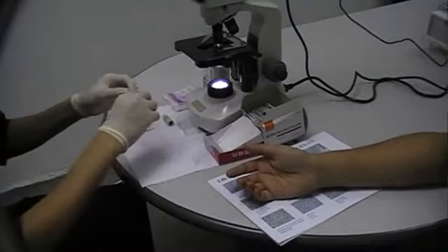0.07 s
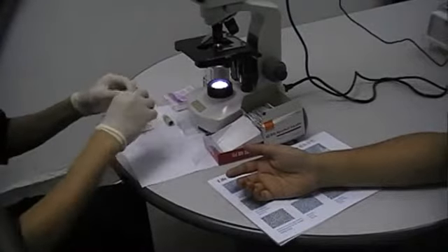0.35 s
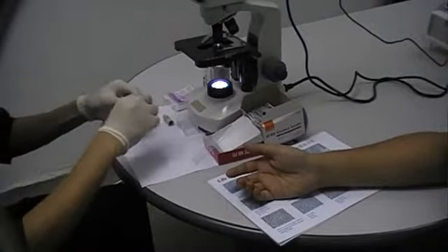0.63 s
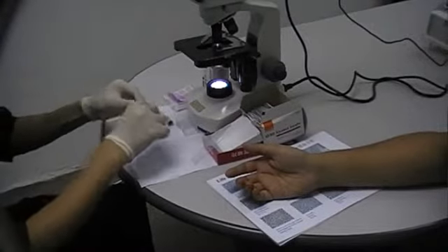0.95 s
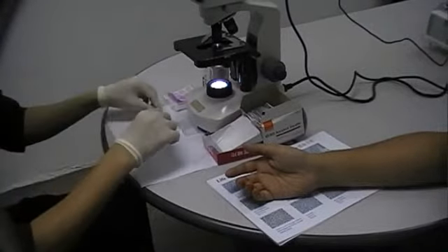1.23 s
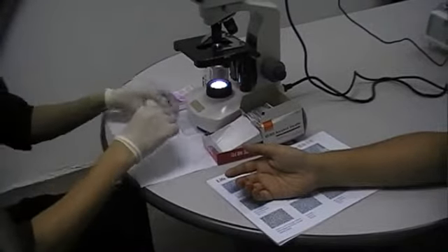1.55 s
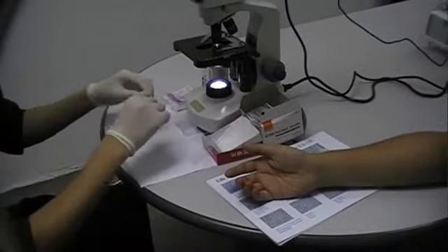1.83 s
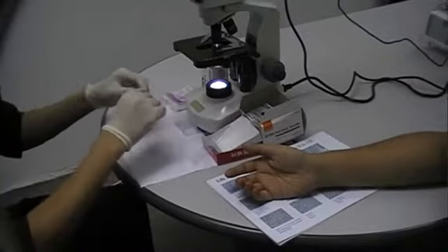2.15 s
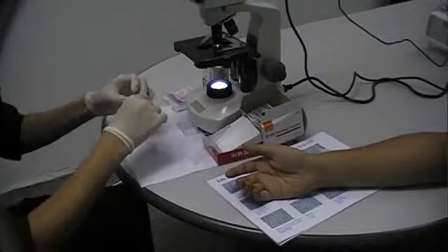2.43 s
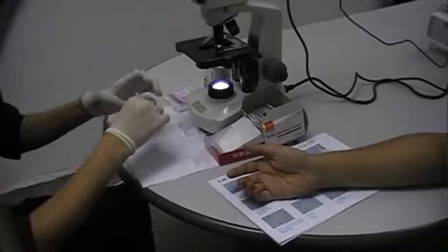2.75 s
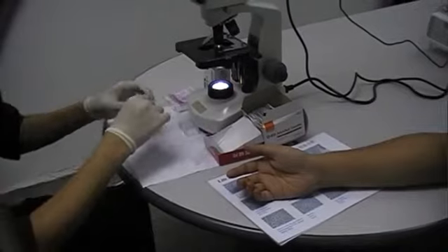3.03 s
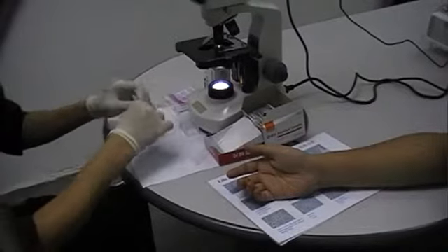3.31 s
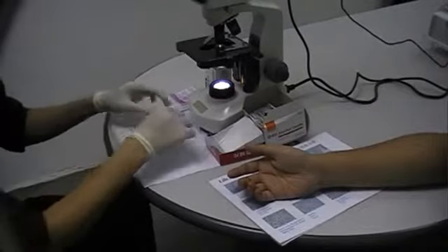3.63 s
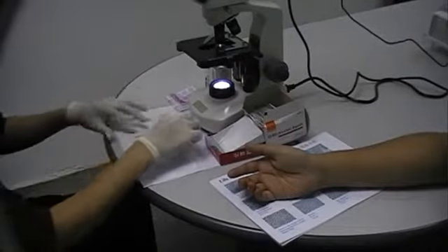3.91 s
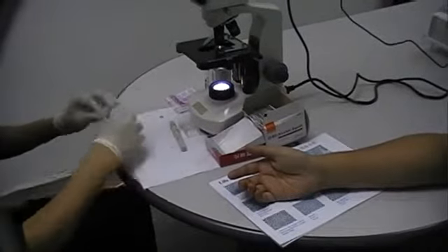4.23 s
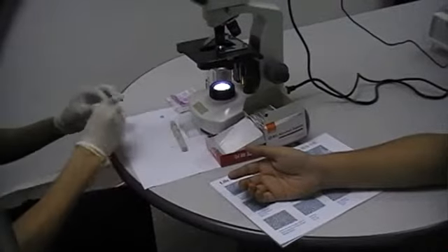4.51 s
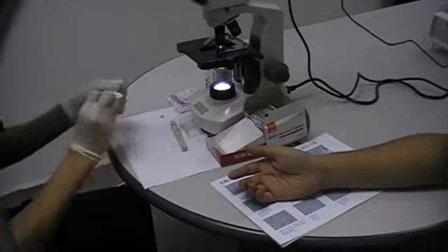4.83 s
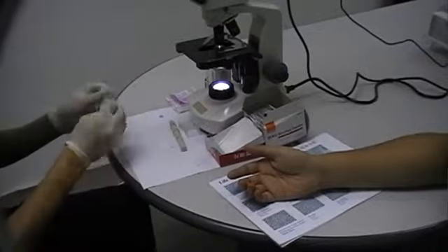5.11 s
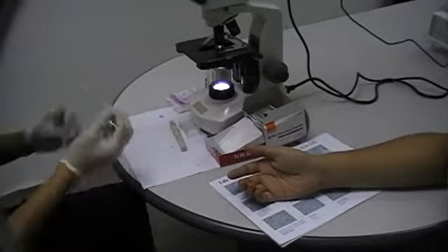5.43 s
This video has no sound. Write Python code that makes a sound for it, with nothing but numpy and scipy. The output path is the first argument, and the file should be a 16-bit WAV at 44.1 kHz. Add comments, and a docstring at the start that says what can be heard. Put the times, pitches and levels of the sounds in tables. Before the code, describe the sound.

Steady ventilation and a faint hum fill a quiet, bare room. Near the microphone, small plastic supplies tick and click as fingers work them, ringing slightly at first, then sounding damped, with soft glove brushing and faint squeaks. Three sharp, loud plastic snaps come almost at once and reverberate briefly. A few rubber glove rubs and light ticks finish the handling.

```python
"""Gloved hands work on small plastic supplies at a table; ventilation and a faint hum run throughout.
First the parts tick by stick-slip friction as they are twisted, and a small hollow part rings with them.
From about 2 s the fingers damp that ringing, while the ticks, glove rubs and faint squeaks go on.
Near 4.5 s a plastic piece snaps loudly three times, and the bare room reverberates, as after each click.
More glove strokes and a few light ticks follow."""
import sys
import numpy as np
from scipy import signal
from scipy.fft import rfft, irfft
from scipy.io import wavfile
from scipy.ndimage import uniform_filter1d

SR = 44100
rng = np.random.default_rng(int(sys.argv[2]) if len(sys.argv) > 2 else 0)


def file_out(sig):
    """Save sig as 16-bit WAV at sys.argv[1]."""
    # one column per channel
    cols = np.atleast_2d(sig).T
    # limit, then scale
    lim = np.clip(cols, -1, 1)
    pcm = np.round(lim * 32767).astype(np.int16)
    wavfile.write(sys.argv[1], SR, pcm)


N = 249606

# Snaps: t/s, level/dB, relative level/dB of the body heard directly and of the body sent into the room,
# then f/Hz, height/dB for each of three resonances that move with the grip
SNAP_EVENTS = [(4.4382, -13, -12, -15, 3830, 14.4, 8750, 9.8, 11600, 18.2),
               (4.5041, -14.5, -9.5, -5.5, 3100, 3.5, 4590, 11, 9400, 11.5),
               (4.5356, -9, -13.5, -2.5, 3300, 12.4, 5080, 8.1, 7800, 9.6)]
# Spectra of the sharp crack and of the dull body: f/Hz, level/dB
CRACK_SPECTRUM = [(200, -31), (600, -9.5), (1300, -11.5), (2000, -9.5), (3300, -6), (4800, -0.5),
                  (6100, -5), (7300, 0), (8400, 2), (10000, -1.5), (12500, -10.5), (14000, -14),
                  (15500, -52.5)]
BODY_SPECTRUM = [(100, -33), (290, -6.5), (460, -14.5), (700, -0.5), (900, -4), (1300, -2.5), (1800, 0.5),
                 (2400, -8), (3200, -1), (4400, -6.5), (8000, -27), (15000, -40)]
# Resonances of the body: f/Hz, width/Hz, height/dB
BODY_RESONANCES = [(288, 36, 5.1), (678, 170, 6.2), (978, 56, 9.8), (1220, 80, 4.5)]


def snaps(quality_factor=14, crack_s=0.00122, body_s=0.0027, ring_share=0.31):
    """Directivity: a crack beams its resonances forward; its broad sound and body spread into the room."""
    forward, spread, t = np.zeros(N), np.zeros(N), np.arange(4096) / SR
    impulse = 1. * (t == 0)
    for onset, db, body_db, room_body_db, *resonances in SNAP_EVENTS:
        peaks = [(hz, hz / quality_factor, height) for hz, height in np.reshape(resonances, (-1, 2))]
        crack = unit_click(coloured(slips(t, crack_s), CRACK_SPECTRUM, peaks=peaks))
        body = unit_click(coloured(slips(t, body_s), BODY_SPECTRUM, peaks=BODY_RESONANCES))
        add(forward, onset, gain_of(db) * (crack + gain_of(body_db) * body))
        low_peaks = [(hz, width, ring_share * height) for hz, width, height in peaks]
        broad = unit_click(coloured(impulse, CRACK_SPECTRUM, peaks=low_peaks))
        thump = unit_click(coloured(impulse, BODY_SPECTRUM, peaks=BODY_RESONANCES))
        add(spread, onset, gain_of(db) * (gain_of(-1.5) * broad + gain_of(room_body_db) * thump))
    return forward, spread


# Contacts of the parts: t/s, level/dB, tilt/(dB/octave), then the ping's f/Hz, height/dB, width/Hz
CONTACTS = [(0.295, -43.5, -12, 3330, 6, 1000), (0.38, -56, -6, 4700, 11, 800),
            (0.718, -42, -3.5, 3370, 11, 350), (0.765, -39.5, -6.5, 10300, 4, 900),
            (0.828, -43.5, -10.5, 4300, 3, 800), (0.873, -45, -4.5, 3390, 6, 800),
            (0.9577, -45, -3, 4580, 14, 350), (1.0094, -31.5, -1.5, 4380, 9.5, 1000),
            (1.3117, -44, -11, 4400, 4, 900), (1.955, -40.5, 1.5, 6900, 6, 900),
            (1.9975, -42, 1.5, 5970, 7, 900), (2.1228, -43, -1.5, 6900, -7, 600),
            (2.135, -41, 0, 7060, 5, 900), (2.375, -53, 1, 8000, 0, 900), (2.549, -50, 4, 8700, 7, 2500),
            (2.577, -42.5, 2.5, 5800, 16, 1300), (2.62, -45, -3, 6000, 1, 900),
            (2.649, -49, -7, 3500, 11, 1200), (2.71, -44.5, -8, 4160, 9, 1200),
            (2.7999, -34.5, 5, 5660, 9, 900), (2.8658, -36, 3, 3420, 13, 1100),
            (2.879, -37, -4, 8800, 7, 1400), (3.2308, -41, 13, 8700, 6, 900),
            (3.640, -44, 2, 8700, 12, 1200), (4.179, -57, 9, 9500, 16, 1200), (4.237, -39, 0, 8950, 4, 920),
            (4.287, -43.5, -8, 4570, 8, 900), (4.317, -47.5, -6, 8200, 9, 700),
            (4.4362, -33, 2, 8550, 5.5, 600), (5.36, -50.5, -8, 4030, 10, 900),
            (5.39, -49.5, 2, 8500, 5, 1500), (5.5114, -36.5, 2.5, 8400, -1, 600),
            (5.63, -55, -7, 3900, 17, 900)]
# Spectrum of a contact: f/Hz, level/dB
CONTACT_SPECTRUM = [(200, -25.5), (1200, -9.5), (2300, -4), (3300, -3.5), (4200, -3.5), (5600, -5),
                    (7200, -5.5), (8800, -3.5), (10300, -4.5), (12000, -14.5), (13500, -20), (15500, -45)]
# Modes of the hollow part: f/Hz, level/dB, T60/s
HOLLOW_MODES = [(3480, 2, 0.02), (4174, 6.5, 0.022), (4620, 8.5, 0.022), (5500, 2, 0.016),
                (8490, -11, 0.059), (10100, -5, 0.025)]
# Its ringing as the fingers loosen, then close round it: t/s, level/dB relative to the contact
RING_LEVELS = [(0.3, -10), (0.72, 4.5), (0.77, -1), (0.85, -11), (0.96, 3), (1.01, 3.5), (1.3, 1),
               (1.95, -26)]


def ticks(after_slip_db=-10, coupling=0.6, usual_scrape_s=0.0018, usual_db=-41, halving_db=11):
    """Impulse excitation: a contact scrapes, pings and rings the hollow part, most in modes near the ping."""
    cracks, rings, t = np.zeros(N), np.zeros(N), np.arange(4096) / SR
    for onset, db, tilt, ping_hz, ping_db, width_hz in CONTACTS:
        scrape_s = usual_scrape_s * 0.5 ** (max(db - usual_db, 0) / halving_db)  # harder is shorter
        scrape = unit_click(slips(t, scrape_s)) + gain_of(after_slip_db) * after_slips(t)
        ping = [(ping_hz, width_hz, ping_db)]
        add(cracks, onset, gain_of(db) * unit_click(coloured(scrape, CONTACT_SPECTRUM, tilt, ping)))
        modes = [(hz, level + coupling * peaks_db(ping, hz), t60) for hz, level, t60 in HOLLOW_MODES]
        ring_db = np.interp(onset, *np.transpose(RING_LEVELS))
        add(rings, onset, gain_of(db + ring_db) * ring(modes, t))
    return cracks, rings


def slips(t, decay_s, passes=6):
    """Stick-slip friction: a quickly dying burst of micro-slips with a flat spectrum."""
    fade = np.exp(-t / decay_s)
    burst = rng.choice([-1., 1.], len(t)) * fade
    for _ in range(passes):
        flattened = irfft(np.exp(1j * np.angle(rfft(burst))), len(t))
        burst = flattened * np.minimum(10 * fade, 1)  # confine it in time again
    return burst


def after_slips(t, per_s=900, fade_s=0.013):
    """Relaxation: a few tiny slips follow as the grip settles."""
    sparse = rng.standard_normal(len(t)) * (rng.random(len(t)) < per_s / SR)
    return unit_click(sparse * np.exp(-t / fade_s) + 1e-9 * (t == 0))


def ring(modes, t):
    """Modal superposition: damped sines of a struck object, neighbouring modes in antiphase."""
    swings = (gain_of(db - 60 * t / t60) * np.sin(2 * np.pi * hz * t + np.pi * k)
              for k, (hz, db, t60) in enumerate(modes))
    return unit_click(sum(swings))


# Spells in which the fingers work the parts round: start t/s, end t/s
BRUSHING_SPELLS = [(0.56, 0.86), (2.45, 3.85), (4.152, 6.9)]
# Glove strokes: peak t/s, level/dB, rise/s, tilt/(dB/octave)
STROKES = [(0.35, -71.5, 0.067, 2), (0.68, -69, 0.024, 3), (2.01, -61, 0.06, -8), (2.43, -69.5, 0.18, -4),
           (2.63, -65.5, 0.057, -1), (2.814, -57, 0.014, -3), (2.881, -62, .014, -9),
           (3.234, -57, 0.023, 1), (4.25, -63.5, 0.039, 7), (4.428, -51.5, 0.0062, 6),
           (4.887, -51, 0.065, 7.5), (5.012, -49, 0.019, 5), (5.40, -65, 0.035, -1),
           (5.5, -56.5, 0.029, 8.5)]


def gloves(brush_db=-73, ease_s=0.098, fall_per_rise=0.74):
    """Sliding friction: light brushing while the fingers work, and strokes that swell and fade."""
    clock, t = np.arange(N) / SR, np.arange(-SR // 4, SR // 4) / SR
    busy = sum(np.clip(np.minimum(clock - start, end - clock) / ease_s, 0, 1)
               for start, end in BRUSHING_SPELLS)
    out = gain_of(brush_db) * busy * rubber(N, tilt=-1)
    for peak_s, db, rise_s, tilt in STROKES:
        width_s = np.where(t < 0, rise_s, fall_per_rise * rise_s)
        swell = np.exp(-0.5 * (t / width_s) ** 2)
        add(out, peak_s + t[0], gain_of(db) * swell * rubber(len(t), tilt))
    return out


# Spectrum of rubber on plastic: f/Hz, level/dB
RUBBER_SPECTRUM = [(100, -46), (500, -13), (2000, -2), (4000, -2), (6000, -5.5), (8000, -0.5), (9500, -1),
                   (11500, -8), (13500, -16.5), (15000, -25), (15800, -35)]


def rubber(size, tilt, slips_per_s=5000, spread_db=4.0):
    """Shot noise: rubber sliding on plastic makes a dense spray of tiny slips, here at rms 1."""
    strengths = gain_of(spread_db * np.minimum(rng.exponential(1, size), 4))
    spray = rng.standard_normal(size) * strengths * (rng.random(size) < slips_per_s / SR)
    return evened(coloured(spray, RUBBER_SPECTRUM, tilt))


# A glove dragging on plastic: peak t/s, level/dB, half length/s, f/Hz, width/Hz
DRAGS = [(0.84, -64.5, .04, 2150, 300), (2.465, -58.5, 0.051, 1680, 160), (4.259, -64, 0.026, 2340, 201)]


def squeaks(slips_per_s=400):
    """Forced resonance: uneven slips drive one mode into a faint, hoarse squeak."""
    out, t = np.zeros(N), np.arange(-SR // 4, SR // 4) / SR
    for peak_s, db, half_s, hz, width_hz in DRAGS:
        drag = rng.choice([-1., 1.], len(t)) * (rng.random(len(t)) < slips_per_s / SR)
        tone = signal.lfilter(*signal.iirpeak(hz, hz / width_hz, SR), drag)
        swell = np.exp(-0.5 * (t / half_s) ** 2)
        add(out, peak_s + t[0], gain_of(db) * evened(tone) * swell)
    return out


# Reflections from table, instrument and walls: delay t/s, level/dB midway between the channels
REFLECTIONS = [(.0021, -8.5), (.0075, -15), (.0105, -16), (.0158, -14.5), (.0200, -22), (.0460, -25)]


def early_reflections(x, lean_db=4, scatter_s=0.0012):
    """Scattering: reflections arrive from alternate sides, each smeared by the clutter that it meets."""
    out, t = np.zeros((2, N)), np.arange(1024) / SR
    for k, (delay_s, db) in enumerate(REFLECTIONS):
        smear = slips(t, scatter_s)
        echo = signal.oaconvolve(x, smear / np.linalg.norm(smear))
        add(out[k % 2], delay_s, gain_of(db + lean_db) * echo)
        add(out[1 - k % 2], delay_s, gain_of(db - lean_db) * echo)
    return out


# Reverberation time: f/Hz, T60/s
REVERB_TIMES = [(200, 0.55), (700, 0.49), (1500, 0.4), (3000, 0.41), (5000, 0.38), (9000, 0.32),
                (14000, 0.22)]
# Strength of the tail: f/Hz, level/dB relative to the sound that excites it
REVERB_SPECTRUM = [(200, 3.5), (800, 1), (2000, 3), (3500, 0), (5000, -1.5), (9000, -1), (14000, -4.5)]


def reverberation(x, coherence=0.75, bass_build_s=0.013, treble_build_s=0.00055):
    """Diffuse field: the treble arrives at once and dies first, the bass builds up and lingers."""
    hz, t, noise = signal.stft(rng.choice([-1., 1.], (2, SR)), SR, nperseg=256)
    build_s = curve_at([(900, bass_build_s), (4000, treble_build_s)], hz)[:, None]
    t60 = curve_at(REVERB_TIMES, hz)[:, None]
    envelope = gain_of(-60 * t / t60) * (1 - np.exp(-t / build_s))
    envelope /= np.sqrt(SR * np.mean(envelope ** 2, axis=1, keepdims=True))  # equal energy per band
    band_gain = gain_of(curve_at(REVERB_SPECTRUM, hz))[:, None]
    tails = signal.istft(noise * envelope * band_gain, SR, nperseg=256)[1]
    return signal.fftconvolve(x[None], stereo_pair(*tails, coherence), axes=1)[:, :N]


def shifting_reverberation(x, paths=3, turns_per_s=9):
    """Multipath: clicks leave in different directions, modelled by a cyclic crossfade between tails."""
    turn = np.arange(N) / SR * turns_per_s
    shares = np.array([np.maximum(np.cos(2 * np.pi * (turn - k / paths)), 0) for k in range(paths)])
    shares /= np.linalg.norm(shares, axis=0)
    return sum(reverberation(x * share) for share in shares)


# Spectral density of the air flow: f/Hz, relative level/dB
AIR_SPECTRUM = [(25, -38), (60, -19.5), (105, -19), (140, -9), (175, -11), (290, -7), (480, -7),
                (750, -2.5), (1190, -2.5), (2100, -13), (5700, -28.5), (9000, -29.5), (12500, -35),
                (15500, -57)]
# Likeness of left and right: f/Hz, coherence
AIR_COHERENCE = [(60, 0.32), (150, .68), (380, 0.82), (950, 0.77), (2400, 0.41), (6000, 0.073),
                 (13000, 0.94)]
# Duct resonances: f/Hz, width/Hz, height/dB
DUCT_RESONANCES = [(346, 154, 7.5), (578, 155, 6), (1125, 85, 0)]
# Fan tones: f/Hz, rms level/dB
FAN_TONES = [(146, -71), (2186, -72)]


def ventilation(air_db=-49, waver_hz=1.25):
    """Source and filter: steady flow noise passes duct resonances, beside two wavering fan tones."""
    hz = np.fft.rfftfreq(N, 1 / SR)
    shape_db = curve_at(AIR_SPECTRUM, hz) + peaks_db(DUCT_RESONANCES, hz)
    noise = stereo_pair(*rfft(rng.standard_normal((2, N))), curve_at(AIR_COHERENCE, hz))
    out = gain_of(air_db) * evened(irfft(noise * gain_of(shape_db), N))
    for tone_hz, db in FAN_TONES:
        waver = evened(uniform_filter1d(rng.standard_normal(N), size=6000))
        phase = 2 * np.pi * np.cumsum(tone_hz + waver_hz * waver) / SR
        out += gain_of(db) * np.sqrt(2) * np.sin(phase)
    return out


def low_cut(x, corner_hz=190):
    """Microphone low cut: thins the bass of the clicks, rubs and their reverberation."""
    return signal.sosfilt(signal.butter(3, corner_hz, "highpass", fs=SR, output="sos"), x)


def coloured(x, spectrum, tilt=0, peaks=(), size=2048):
    """Minimum-phase filter: a spectrum, tilted in dB/octave above 1500 Hz, with resonances that ring."""
    hz = abs(np.fft.fftfreq(size, 1 / SR))
    shape_db = curve_at(spectrum, hz) + tilt * np.log2(np.maximum(hz, 1500)) + peaks_db(peaks, hz)
    log_response = np.conj(signal.hilbert(np.log(gain_of(shape_db))))
    taps = np.fft.ifft(np.exp(log_response)).real
    return signal.fftconvolve(x, taps[:size // 2])[:len(x)]


def peaks_db(peaks, hz):
    """Resonance curves in dB, summed over rows of f/Hz, width/Hz, height/dB."""
    return sum(db / (1 + (2 * (hz - centre) / width) ** 2) for centre, width, db in peaks)


def curve_at(points, hz):
    """Interpolation on a log-frequency axis."""
    f, value = np.transpose(points)
    return np.interp(np.log(hz + 1), np.log(f + 1), value)


def stereo_pair(a, b, coherence):
    """Partial coherence: two channels from the sum and difference of unrelated signals."""
    mid, side = np.sqrt((1 + coherence) / 2) * a, np.sqrt((1 - coherence) / 2) * b
    return np.array([mid + side, mid - side])


def gain_of(db):
    """Amplitude ratio of a level in decibels."""
    return 10 ** (np.asarray(db) / 20)


def evened(x):
    """Normalisation to rms 1."""
    return x / np.sqrt(np.mean(x ** 2) + 1e-20)


def unit_click(x):
    """Normalisation to the energy of one millisecond at rms 1."""
    return x * np.sqrt(SR / 1000 / np.sum(x ** 2))


def add(mix, onset_s, sound):
    """Superposition of a sound on the mix from its onset."""
    part = mix[max(round(onset_s * SR), 0):][:len(sound)]
    part += sound[:len(part)]


def scene(ring_room_db=-3):
    """Direct and reverberant fields: hands a little to the right and their room, over the ventilation."""
    air = ventilation() * gain_of([[-0.25], [0.25]])
    snaps_forward, snaps_spread = snaps()
    cracks, rings = ticks()
    friction = gloves() + squeaks() + cracks
    direct = friction + rings + snaps_forward
    tail = shifting_reverberation(friction + gain_of(ring_room_db) * rings + snaps_spread)
    near = low_cut(direct + early_reflections(direct)) * gain_of([[-0.6], [0.6]])
    return air + near + low_cut(tail)


def record(dry, edge_hz=15700):
    """Band limiting: a steep low-pass removes the highest treble."""
    taps = signal.firwin(511, edge_hz, window=("kaiser", 9), fs=SR)
    return signal.oaconvolve(dry, taps[None], "same")


dry = scene()
out = record(dry)
file_out(out)
```